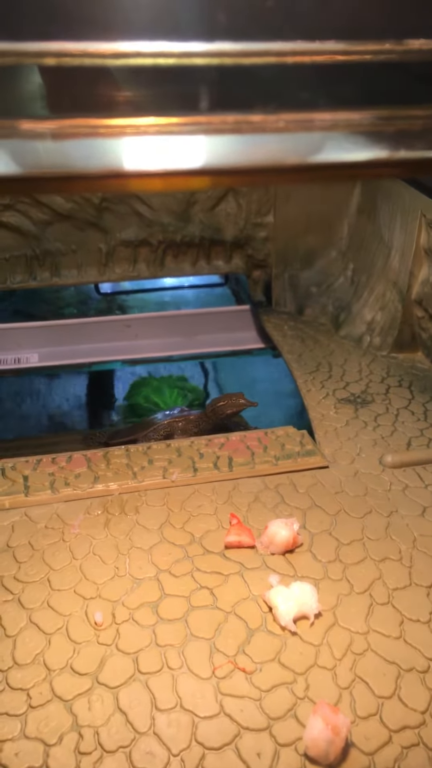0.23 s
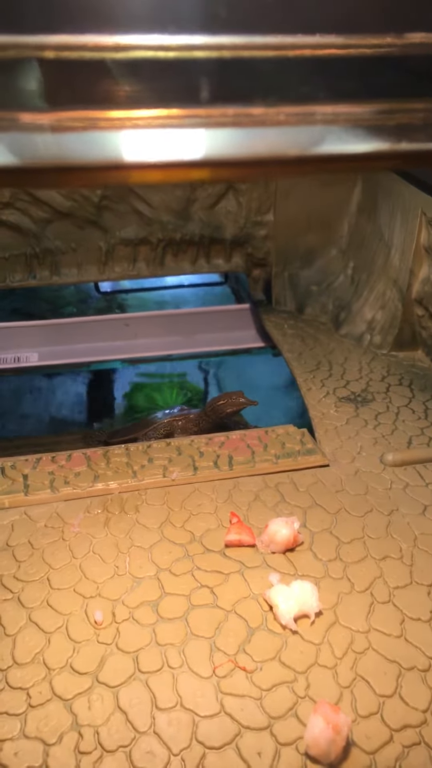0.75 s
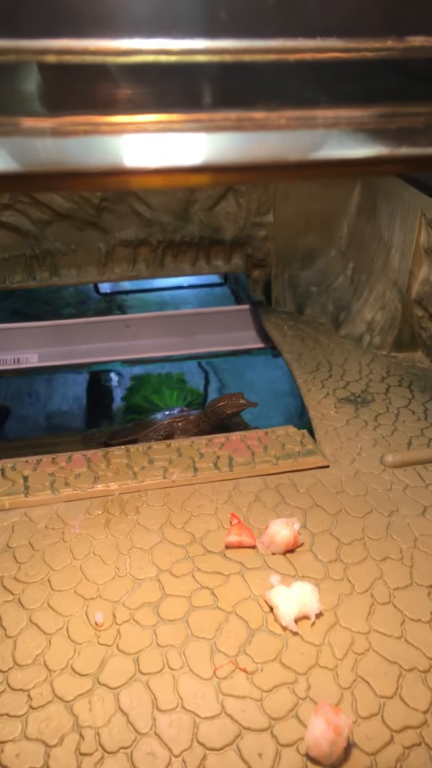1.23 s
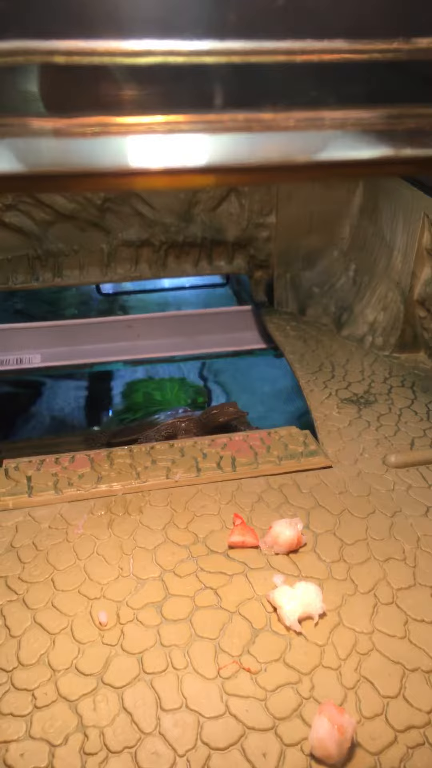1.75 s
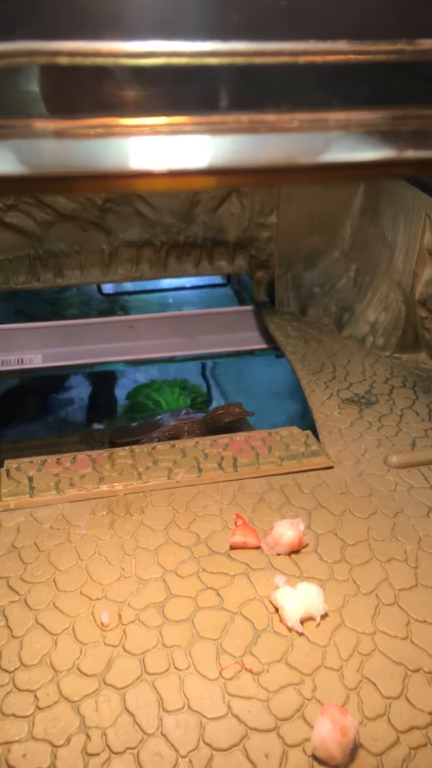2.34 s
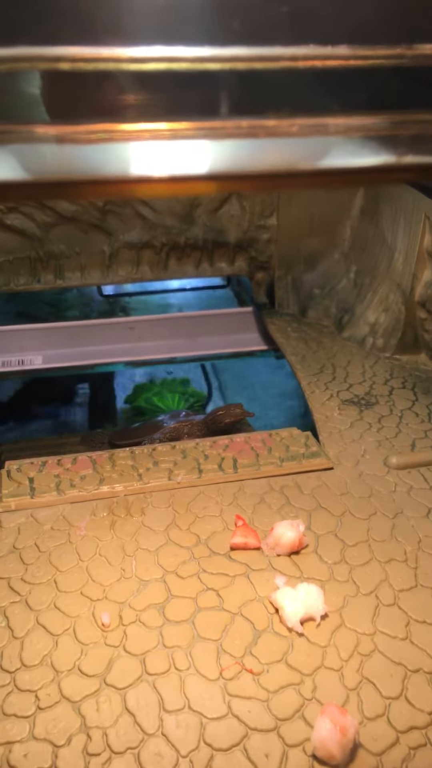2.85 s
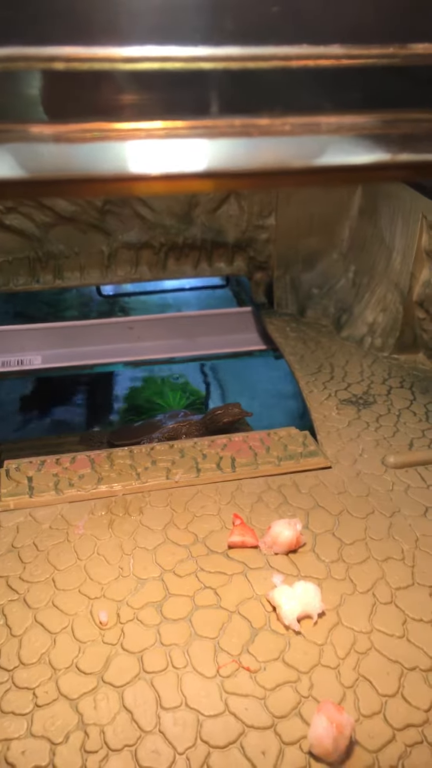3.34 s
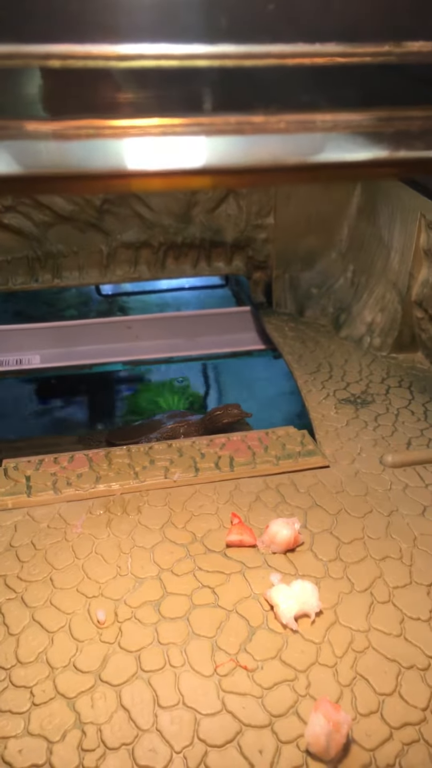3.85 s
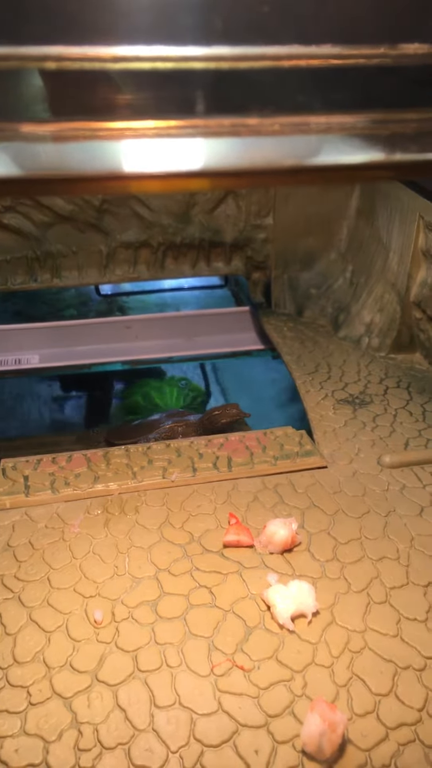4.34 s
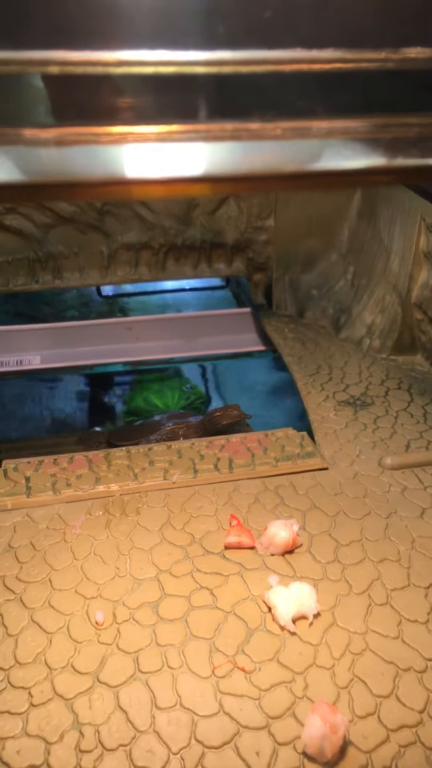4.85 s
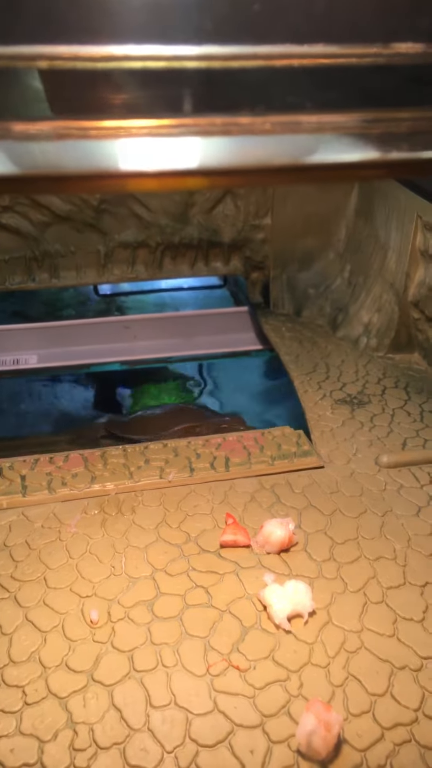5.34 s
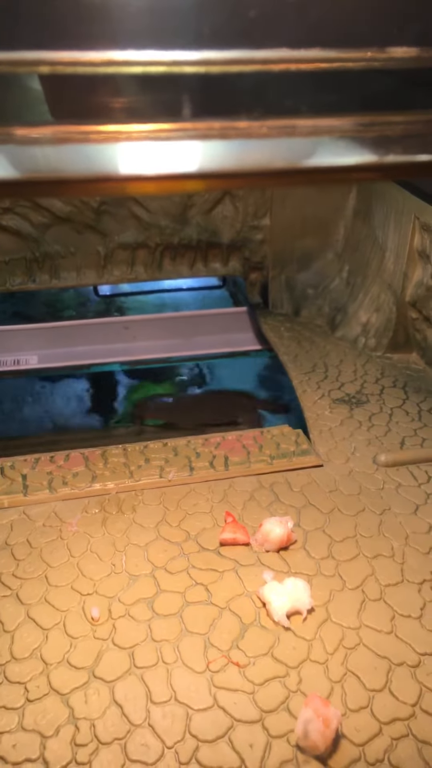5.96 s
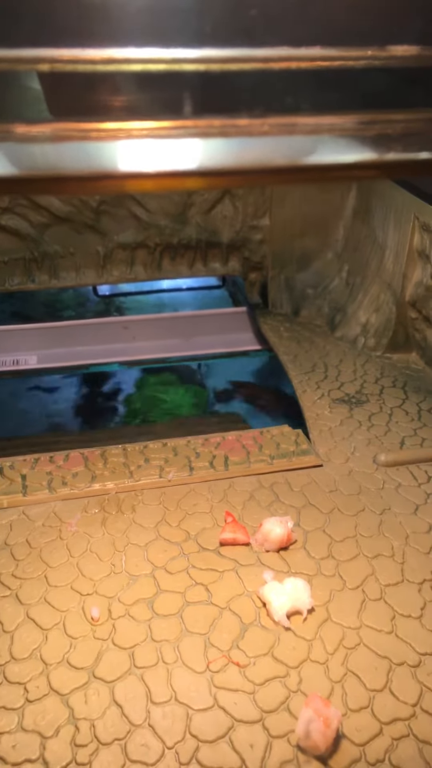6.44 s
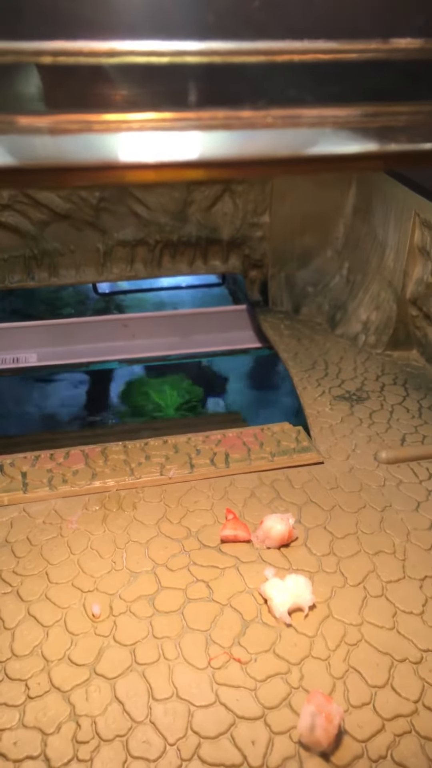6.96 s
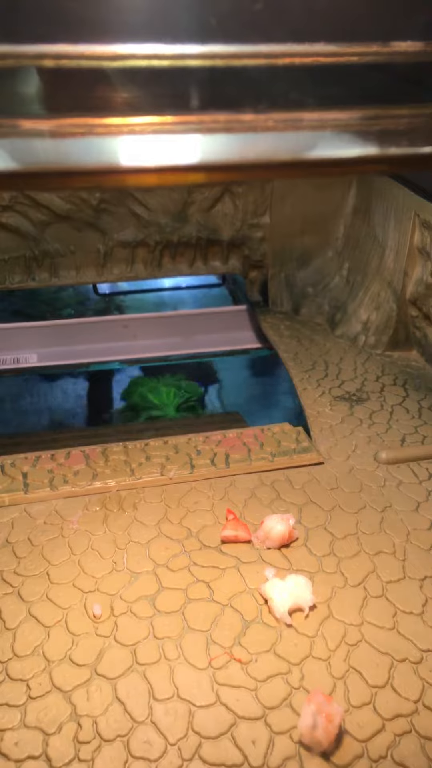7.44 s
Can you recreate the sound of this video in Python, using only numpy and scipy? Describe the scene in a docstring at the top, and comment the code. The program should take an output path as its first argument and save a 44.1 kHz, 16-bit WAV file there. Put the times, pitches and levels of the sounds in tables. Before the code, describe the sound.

An aquarium filter pump hums steadily over faint churning, fizzing water, with a few small clicks and scrapes on plastic.

```python
"""Throughout, a turtle tank's filter pump hums at mains harmonics, its impeller rattles faintly, water churns
in the housing, and the outflow hisses and fizzes with tiny bubbles. Near 2 s something small, probably the
turtle, clicks and scrapes on the plastic deck; bubbles ring. Stray ticks and bubbles follow, then a longer bout
of clicks and scrapes from 5.2 s. Near 6.3 s one soft thud of the tank wall follows, and a last bubble rings
near 6.9 s."""
import sys
import numpy as np
from scipy import signal
from scipy.fft import rfft, irfft
from scipy.io import wavfile
from scipy.ndimage import uniform_filter1d

SR = 44100
rng = np.random.default_rng(int(sys.argv[2]) if len(sys.argv) > 2 else 0)


def persist_wave(psi):
    """Save psi, clipped to +-1, as 16-bit WAV."""
    counts = np.round(np.clip(psi, -1, 1) * 32767).astype(np.int16)
    wavfile.write(sys.argv[1], SR, np.atleast_2d(counts).T)


N = 339570
TIME_S = np.arange(N) / SR
FREQ_HZ = np.maximum(np.arange(N // 2 + 1) * SR / N, 1)
MAINS_HZ = 60.007

# noise spectra: (frequency [Hz], relative density [dB])
RUMBLE_SPECTRUM = [(12, -9.5), (30, -23), (48, 1), (85, -6), (147, -10.5), (250, -5.5), (340, -11.5),
                   (430, -26), (600, -54)]
OUTFLOW_SPECTRUM = [(200, -8), (520, -2.5), (720, -3), (1000, 3), (1280, 2.5), (1500, -3.5), (2150, -9),
                    (2700, -15), (3400, -12.5), (4900, -28), (5800, -22), (9200, -18.5), (10400, -23.5),
                    (15800, -26)]
CRACK_SPECTRUM = [(1200, -8.5), (2600, -12), (3300, 3), (4200, 2), (4800, -7), (5500, 4), (7300, -4.5),
                  (9200, -2), (10500, -12), (12500, -13), (15800, -24)]
BODY_SPECTRUM = [(200, -3), (500, -3.5), (830, -4), (1300, -8), (1780, -6), (2300, -9.5), (3200, -17.5),
                 (5000, -26)]
EDGE_SPECTRUM = [(5000, -34), (7500, 1.5), (9000, -4), (11000, -11.5), (12800, -8), (15800, -24)]
# resonances: (frequency [Hz], width per stage [Hz], relative gain [dB])
TANK_RESONANCES = [(102.5, 21, 0.5), (126, 7.2, 2), (153, 19, -6), (190, 27, 0), (275.3, 32, -1),
                   (296.5, 46, -1), (333.9, 26, 3), (350.2, 21, -2), (375, 29.4, -9)]
DRONE_RESONANCES = [(220.4, 22, 0), (236.4, 21.6, 0)]
WALL_RESONANCES = [(67.4, 33, 0), (102, 40, 0)]
DECK_RESONANCES = [(3110, 45, -26.5), (5240, 210, -26.5), (5900, 510, -20), (7100, 580, -29.5)]
WHISTLE_RESONANCES = [(3118, 26, 0), (3262, 36, -8), (3590, 70, -5), (3815, 60, -8), (3925, 30, -11),
                      (4135, 90, -13), (4460, 140, -12)]
IMPELLER_RESONANCES = [(2058, 255, 1.5), (3068, 130, -3.5), (3643, 146, -5)]
# outflow fizz: (time [s], level [dB])
FIZZ_LEVELS = [(0, -79.5), (1.05, -74), (2.0, -77.5), (3.4, -74), (3.7, -78.5), (4.6, -73.5), (6.7, -76.5),
               (7.7, -75)]
# swell strength: (time [s], drone boost at a crest [dB])
DRONE_SWELLS = [(0, 8), (1.4, 5.5), (2.5, 7), (3.0, 1.5), (3.5, 4), (4.1, 6), (5.1, 3), (5.7, 7.5),
                (6.25, 4.5), (6.8, 7), (7.7, 8.5)]
# drags on the deck: (start [s], length [s], level [dB])
DECK_SCRAPES = [(1.784, 0.2, -73), (5.164, 0.23, -67.5), (5.38, .24, -69), (5.702, 0.25, -73.5),
                (5.99, .18, -74)]
# single bubbles: (time [s], peak [dB], frequency [Hz], t60 [s])
RINGING_BUBBLES = [(.455, -58, 498, 0.15), (1.916, -55.5, 1860, 0.056), (1.932, -59, 526, 0.087),
                   (1.994, -57, 1880, 0.081), (2.41, -61.5, 490, .18), (3.925, -59.5, 482, 0.19),
                   (5.022, -64, 5720, .04), (5.168, -56.5, 830, 0.22), (5.171, -57, 3790, 0.07),
                   (5.442, -58, 692, 0.18), (5.448, -59, 1010, .11), (6.113, -54.5, 3090, 0.12),
                   (6.333, -50.5, 1690, 0.065), (6.338, -56, 838, 0.14), (6.929, -60, 5770, 0.032)]
# deck clicks: (time [s], crack level [dB], body, ring, edge [dB re crack], rise [s], t60 [s])
DECK_CLICKS = [(1.84, -65, 4, -12, -2, .002, 0.066), (1.862, -57.5, -2.5, 3, -3, 0.0016, 0.04),
               (1.875, -63, -4, -1, -15, 0.0018, 0.058), (1.886, -47.5, -16, -2, -25, 0.0023, 0.089),
               (1.9, -46.5, -7, -1.5, -14, 0.0035, 0.048), (1.983, -55.5, -1.5, 11, -1, 0.0025, 0.034),
               (2.461, -66.5, -4, -6, -3, 0.0018, .05), (3.462, -64, -12, 6, -16, 0.0016, 0.082),
               (3.715, -68, 0, -4, -15, 0.0025, 0.078), (5.164, -53.5, -1.5, -23, -0.5, 0.0082, 0.069),
               (5.26, -64.5, 4.5, 4, -2, 0.0058, 0.13), (5.44, -69, 11.5, 2, -13, 0.0096, 0.092),
               (5.525, -67, 1.5, -3, -6, .008, 0.29), (5.676, -64.5, -3, -10, -5, .003, 0.086),
               (5.774, -67, 3, -6, -15, .003, 0.098), (5.818, -71, -10, -13, 15.5, 0.00078, 0.038),
               (6.008, -62, -2, -10, -5, 0.0039, 0.19), (6.051, -63.5, 2, 1, -12, 0.0018, 0.07),
               (6.0963, -61, -5, 12, 2, 0.0009, 0.089), (6.279, -59, 3.5, -3, -23, 0.013, 0.13),
               (6.331, -49, -3.5, -1, -5, 0.0025, 0.072)]
# impeller contacts per two turns: (position [turns], relative strength [dB])
IMPELLER_CONTACTS = [(.77, 0), (1.77, -1), (1.96, 0)]
# motor hum: (mains multiple, rms level [dB])
HUM_HARMONICS = [(1, -46.5), (2, -63.5), (3, -55.5), (4, -60), (5, -64), (6, -60.5), (8, -79), (9, -78.5),
                 (10, -83.5), (11, -84), (13, -81), (14, -78), (15, -80), (16, -90), (17, -76.5), (19, -88),
                 (21, -78.5), (52, -83.5)]


def from_db(db):
    """Decibels to gain."""
    return 10 ** (np.asarray(db) / 20)


def unit_rms(x):
    """Scale to rms 1."""
    return x / np.sqrt(np.mean(x ** 2) + 1e-20)


def gain_curve(rows):
    """Gain over time from (time [s], level [dB])."""
    return from_db(np.interp(TIME_S, *np.transpose(rows)))


def shaped_noise(gain):
    """Noise of rms 1, weighted per frequency."""
    return unit_rms(irfft(rfft(rng.standard_normal(N)) * gain, N))


def coloured_noise(spectrum):
    """Noise from (frequency [Hz], relative density [dB])."""
    hz, db = np.transpose(spectrum)
    return shaped_noise(from_db(np.interp(np.log(FREQ_HZ), np.log(hz), db)))


def drift(corner_hz):
    """Low-passed noise, rms 1."""
    return shaped_noise(1 / (1 + (FREQ_HZ / corner_hz) ** 2))


def resonance(hz, width_hz):
    """One band-pass stage, peak gain 1."""
    return 1 / (1 + 1j * (FREQ_HZ ** 2 - hz ** 2) / (FREQ_HZ * width_hz))


def modal_noise(modes):
    """Noise through two-stage resonances."""
    power = sum(from_db(db) ** 2 * abs(resonance(hz, width_hz)) ** 4 for hz, width_hz, db in modes)
    return shaped_noise(np.sqrt(power))


def evened(x, window_s):
    """Hold the running rms near 1."""
    return x / np.sqrt(uniform_filter1d(x ** 2, int(window_s * SR)) + 1e-9)


def envelope(start_s, rise_s, t60_s):
    """Linear rise, exponential decay."""
    age_s = np.maximum(TIME_S - start_s, 0)
    decay = np.log(1000) * np.maximum(age_s - rise_s, 0) / t60_s
    return np.minimum(age_s / rise_s, 1) * np.exp(-np.minimum(decay, 40))


def rumble(level_db):
    """Steady low background."""
    return from_db(level_db) * coloured_noise(RUMBLE_SPECTRUM)


def outflow(level_db, flicker_db):
    """The outflow hisses; its level flickers."""
    return from_db(level_db) * coloured_noise(OUTFLOW_SPECTRUM) * from_db(flicker_db * drift(26))


def fizz(bursts_per_s, centre_hz, log_spread, stage_q, size_db, cloud_db, cloud_hz, bands=9):
    """Tiny bubbles burst in clouds; those of one cloud are alike in size and ring near one pitch."""
    spectrum = 0
    for hz in centre_hz * np.exp(log_spread * np.linspace(-1, 1, bands)):
        sizes = from_db(size_db * np.minimum(rng.exponential(1, N), 4))
        signs = rng.choice([-1, 1], N)
        cloud = from_db(cloud_db * np.minimum(drift(cloud_hz), 2))
        bursts = rng.random(N) < bursts_per_s / bands / SR
        spectrum += rfft(bursts * sizes * signs * cloud) * resonance(hz, hz / stage_q) ** 2
    return gain_curve(FIZZ_LEVELS) * unit_rms(irfft(spectrum * resonance(5920, 1200), N))


def flow(drone_db, churn_db, swell_period_s, crest_s):
    """Flow stirs housing and tank resonances; the low drone swells and eases about twice a second."""
    crest = (1 + np.cos(2 * np.pi * (TIME_S - crest_s) / swell_period_s)) / 2
    swell = gain_curve(DRONE_SWELLS) ** crest
    drone = from_db(drone_db) * swell * evened(modal_noise(DRONE_RESONANCES), 0.17)
    churn = from_db(churn_db) * evened(modal_noise(TANK_RESONANCES), 0.17)
    return drone + churn


def thud(start_s, level_db, rise_s, t60_s):
    """One soft push rings the tank wall's low modes."""
    wall = evened(modal_noise(WALL_RESONANCES), 0.1)
    return from_db(level_db) * envelope(start_s, rise_s, t60_s) * wall


def scrapes(fade_s, ease_db, rough_db):
    """Each drag on the deck grips, eases off as it slides and lets go."""
    grip = np.zeros(N)
    for start_s, length_s, db in DECK_SCRAPES:
        age_s = TIME_S - start_s
        held = np.clip(np.minimum(age_s, length_s - age_s) / fade_s, 0, 1)
        grip += held * from_db(db - ease_db * np.clip(age_s / length_s, 0, 1))
    return grip * coloured_noise(CRACK_SPECTRUM) * from_db(rough_db * drift(60))


def bubbles(glide, flutter):
    """A bubble rings, rising in pitch as it nears the surface; moving water makes it flutter."""
    rings = np.zeros(N)
    for start_s, db, hz, t60_s in RINGING_BUBBLES:
        age_s = TIME_S - start_s
        phase = 2 * np.pi * hz * age_s * (1 + glide * age_s / t60_s)
        rings += from_db(db) * envelope(start_s, t60_s / 10, t60_s) * np.sin(phase)
    return rings * (1 + flutter * drift(110)) / np.sqrt(1 + flutter ** 2)


def clicks(body_t60_ratio, room_db, room_t60_s):
    """Each deck contact: a crack, a bright edge, a deck ring, a slower low body, a short room tail."""
    crack_power, body_power, ring_power, edge_power = np.zeros((4, N))
    for start_s, db, body_db, ring_db, edge_db, rise_s, t60_s in DECK_CLICKS:
        tail = from_db(room_db) * envelope(start_s, rise_s, room_t60_s)
        blow = from_db(db) * (envelope(start_s, rise_s, t60_s) + tail)
        slow_blow = from_db(db) * (envelope(start_s, rise_s, t60_s * body_t60_ratio) + tail)
        crack_power += blow ** 2
        ring_power += (from_db(ring_db) * blow) ** 2
        edge_power += (from_db(edge_db) * blow) ** 2
        body_power += (from_db(body_db) * slow_blow) ** 2
    ring = np.sqrt(ring_power) * evened(modal_noise(DECK_RESONANCES), 0.0078)
    crack = np.sqrt(crack_power) * coloured_noise(CRACK_SPECTRUM)
    edge = np.sqrt(edge_power) * coloured_noise(EDGE_SPECTRUM)
    body = np.sqrt(body_power) * coloured_noise(BODY_SPECTRUM)
    return crack + edge + ring + body


def whistle(level_db):
    """Turbulence rings thin, high resonances in the pump."""
    return from_db(level_db) * modal_noise(WHISTLE_RESONANCES)


def rattle(level_db, uneven_db, jitter_s):
    """The impeller knocks once a turn and bounces every second turn."""
    knocks = np.zeros(N)
    even_turns = np.arange(0, N / SR * MAINS_HZ, 2)
    for turn, db in IMPELLER_CONTACTS:
        timing, force = rng.standard_normal((len(even_turns), 2)).T
        knock_s = (even_turns + turn) / MAINS_HZ + jitter_s * timing
        knocks[np.round(knock_s * SR).astype(int) % N] += from_db(db + uneven_db * force)
    housing = sum(from_db(db) * resonance(hz, width_hz) ** 2 for hz, width_hz, db in IMPELLER_RESONANCES)
    return from_db(level_db) * unit_rms(irfft(rfft(knocks) * housing, N))


def hum(fundamental_waver_db, upper_waver_db):
    """The motor vibrates at mains multiples; the upper ones waver more with the load."""
    phases = rng.uniform(0, 2 * np.pi, len(HUM_HARMONICS))
    tones = np.zeros(N)
    for (multiple, db), phase in zip(HUM_HARMONICS, phases):
        waver_db = (upper_waver_db if multiple > 1 else fundamental_waver_db) * drift(1.4)
        tone = np.sqrt(2) * np.sin(2 * np.pi * multiple * MAINS_HZ * TIME_S + phase)
        tones += from_db(db + waver_db) * tone
    return tones


def scene():
    """Pump, water and small contacts from just above the tank; mono."""
    pump = hum(fundamental_waver_db=0.43, upper_waver_db=1.25)
    pump += rattle(level_db=-74.3, uneven_db=1.0, jitter_s=2e-5)
    pump += whistle(level_db=-80)
    background = rumble(level_db=-55)
    water = outflow(level_db=-64.5, flicker_db=0.5)
    water += fizz(bursts_per_s=11000, centre_hz=6320, log_spread=0.382, stage_q=8.3,
                  size_db=2.5, cloud_db=6, cloud_hz=24)
    contacts = clicks(body_t60_ratio=2.9, room_db=-17.5, room_t60_s=0.19)
    contacts += scrapes(fade_s=0.02, ease_db=5, rough_db=3.5)
    contacts += thud(start_s=6.29, level_db=-46, rise_s=0.17, t60_s=0.4)
    water += flow(drone_db=-54, churn_db=-54, swell_period_s=0.54, crest_s=0.28)
    water += bubbles(glide=0.016, flutter=0.38)
    return (background + water + contacts + pump)[None]


def record(dry):
    """Steep elliptic low-pass."""
    cutoff_hz = 15800
    return signal.sosfilt(signal.ellip(12, 0.1, 70, cutoff_hz, fs=SR, output="sos"), dry)


dry = scene()
out = record(dry)
persist_wave(out)
```